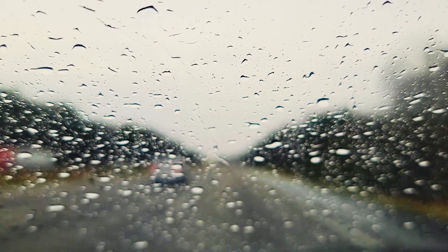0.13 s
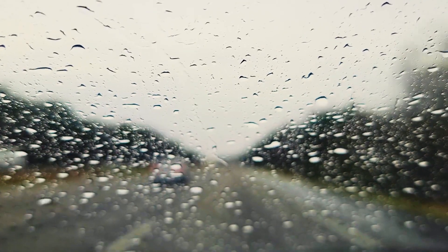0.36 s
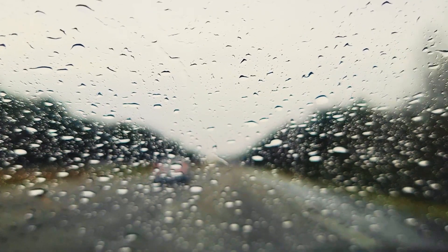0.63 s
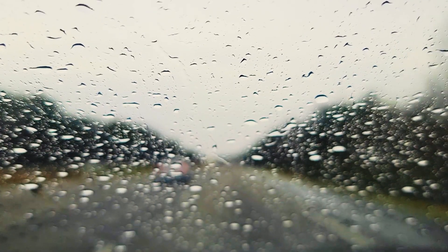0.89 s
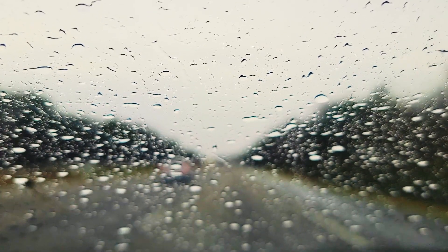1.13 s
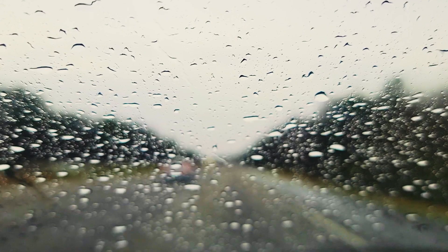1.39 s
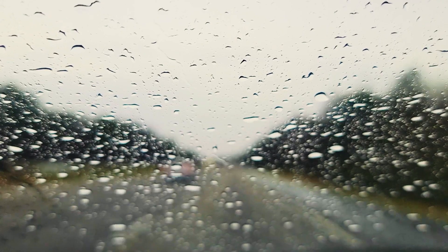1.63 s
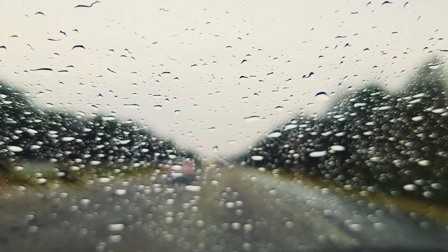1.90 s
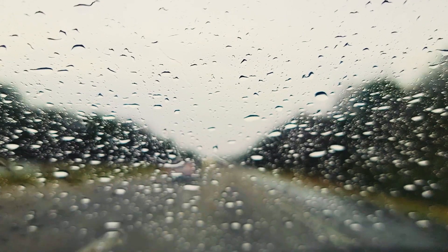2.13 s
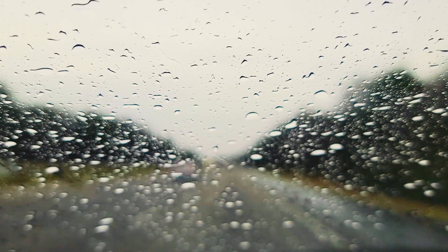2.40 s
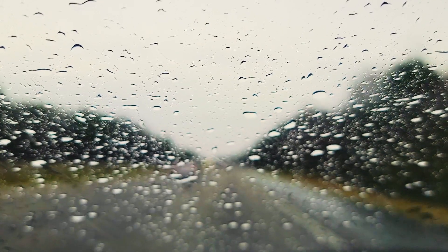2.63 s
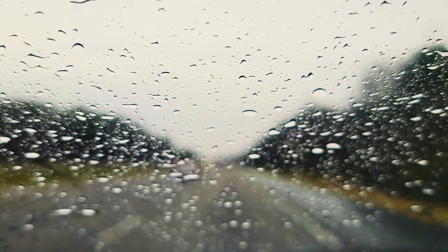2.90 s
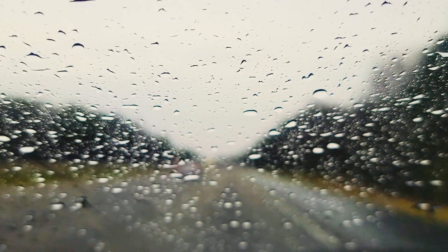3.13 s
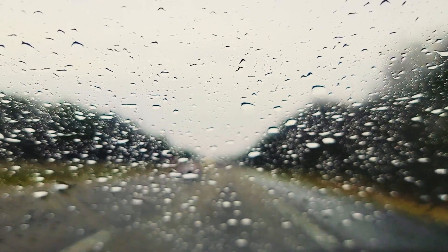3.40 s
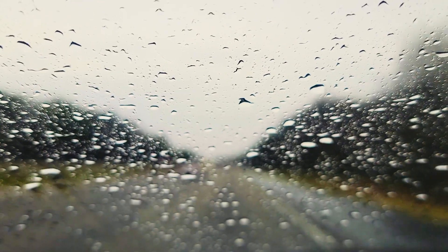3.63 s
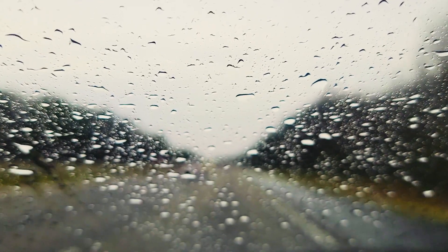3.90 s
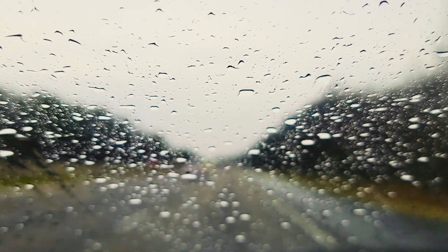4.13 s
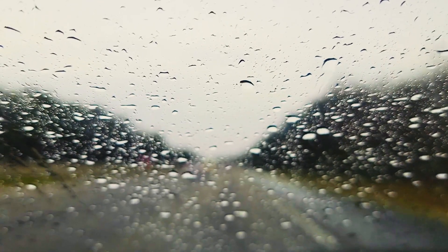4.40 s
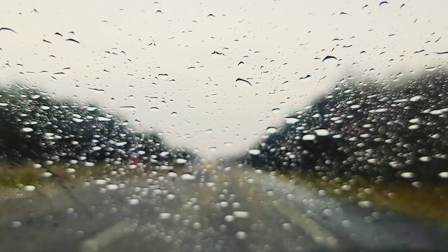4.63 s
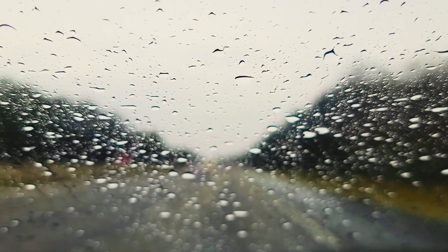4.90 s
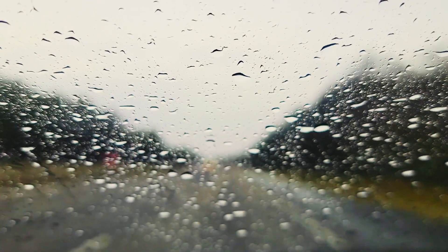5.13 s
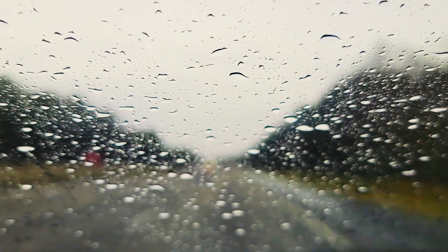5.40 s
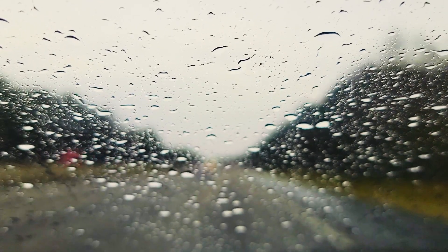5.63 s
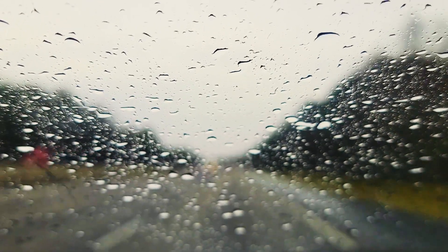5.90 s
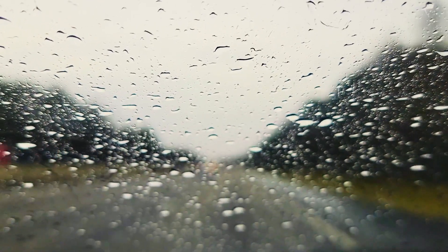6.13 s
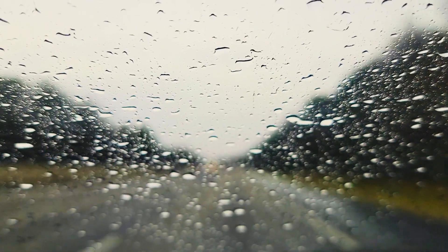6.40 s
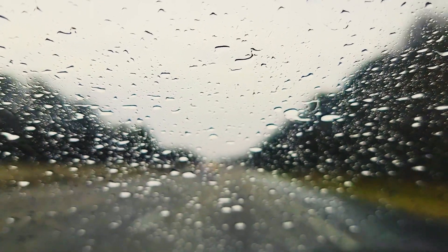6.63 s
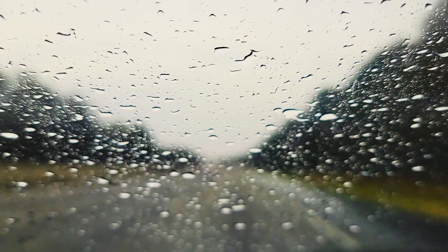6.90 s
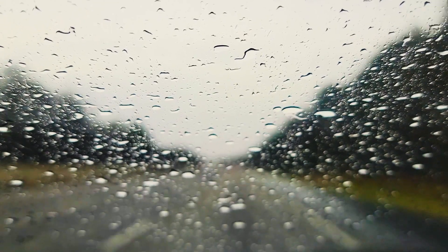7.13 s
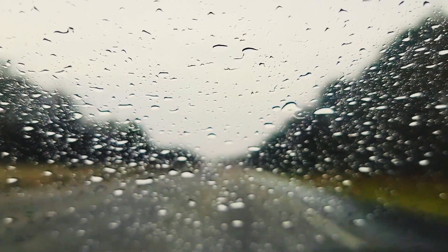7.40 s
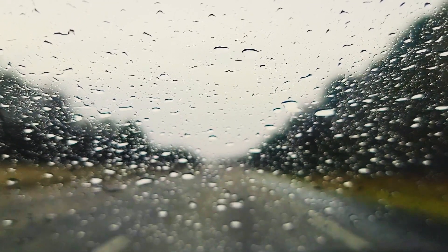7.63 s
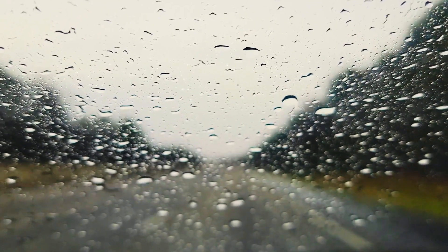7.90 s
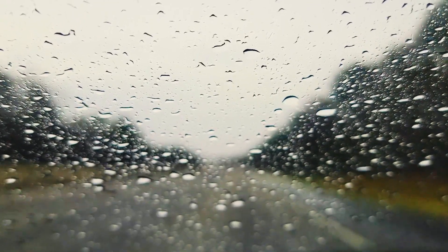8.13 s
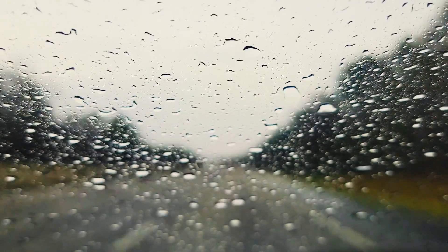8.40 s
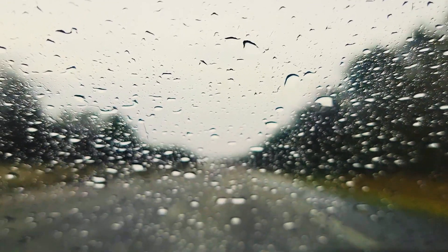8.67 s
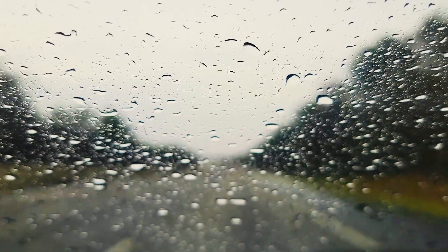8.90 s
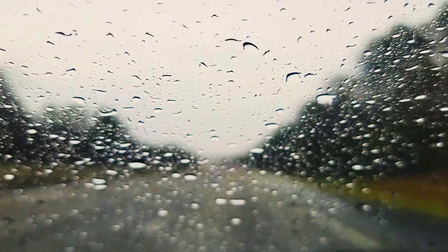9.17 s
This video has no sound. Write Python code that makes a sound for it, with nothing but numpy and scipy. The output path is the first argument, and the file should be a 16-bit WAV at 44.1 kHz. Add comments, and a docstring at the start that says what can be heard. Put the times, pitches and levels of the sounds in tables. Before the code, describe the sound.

Rain patters and taps sharply on a windscreen over the low boomy rumble of a moving car and faint wet-road hiss.

```python
"""Inside a car cruising on a wet road, heard by two spaced microphones behind the windscreen.
The engine drones on its firing tone as sines that slowly rise in pitch. Tyres and body rumble
and the wet road hisses as shaped noise, its bright upper part unsteady in level.
Raindrops and light ticks on the glass are short noise bursts through resonances,
with a short unsteady tone added under each."""
import sys
import numpy as np
from scipy import signal
from scipy.fft import rfft, irfft, next_fast_len
from scipy.io import wavfile
from scipy.ndimage import uniform_filter1d, map_coordinates

SR = 44100
rng = np.random.default_rng(int(sys.argv[2]) if len(sys.argv) > 2 else 0)


def persist_wave(psi):
    """Save psi, clipped to +-1, as 16-bit WAV."""
    counts = np.round(np.clip(psi, -1, 1) * 32767).astype(np.int16)
    wavfile.write(sys.argv[1], SR, np.atleast_2d(counts).T)


def rack_gain(trim_db):
    """Turn a fader trim in dB into the linear factor to multiply a signal by."""
    fader = np.asarray(trim_db, float)
    return 10 ** (fader / 20)


N = 409248


def unit(x):
    """Scale to rms 1."""
    return x / np.sqrt(np.mean(x ** 2) + 1e-20)


def along(points, hz):
    """Read (f/Hz, value) points on a log frequency axis."""
    f, value = np.transpose(points)
    return np.interp(np.log(hz + 1), np.log(f + 1), value)


def curves(rows):
    """One value per sample for each column after the time."""
    seconds, *columns = np.transpose(rows)
    return [np.interp(np.arange(N) / SR, seconds, column) for column in columns]


def wobble(rate):
    """A smooth random curve through rate random knots a second."""
    knots = rng.standard_normal(int(N * rate / SR) + 4)
    return map_coordinates(knots, [np.arange(N) * rate / SR])


def filtered(x, response):
    """Shape x by a complex response of frequency."""
    m = next_fast_len(N + SR // 2)
    return irfft(rfft(x, m) * response(np.fft.rfftfreq(m, 1 / SR)), m)[..., :N]


# firing tone and its multiples: multiple of the firing tone, level/dB against the drone
ORDERS = [(1, -1), (2, -13.5)]
# engine drone in the cabin: t/s, level/dB
DRONE_LEVEL = [(0, -21), (1.5, -19), (3, -20.5), (4.5, -20), (6, -23), (7.5, -20), (9.28, -29)]


def engine():
    """Regular firing gives a tone and its multiples, slightly unsteady; the car gathers speed slowly."""
    firing_hz, gain_hz_per_s = 51.58, 0.32
    drone_db, = curves(DRONE_LEVEL)
    hz = firing_hz + gain_hz_per_s * np.arange(N) / SR
    phase = 2 * np.pi * np.cumsum(hz * (1 + 0.0023 * wobble(3))) / SR
    tones = sum(rack_gain(db + 2.3 * wobble(4.9)) * np.sin(k * phase) for k, db in ORDERS)
    return np.sqrt(2) * rack_gain(drone_db) * tones


# likeness of the two spaced microphones: f/Hz, left-right correlation (-1 to 1)
LIKENESS = [(60, 0.92), (99, 0.98), (160, 0.95), (270, 0.83), (450, 0.47), (740, -0.28), (1220, -0.5),
            (2010, 0.57), (3330, -0.26), (5500, 0.21), (9080, 0.14), (15000, -0.03)]


def rush(spectrum, patchy_db):
    """Stereo noise of rms 1 in random loud and soft patches, as alike at both microphones as LIKENESS says."""
    z = signal.stft(rng.standard_normal((2, N)), nperseg=512)[2]
    field = rng.standard_normal(z.shape[1:])
    # smooth the patches over frequency, then over time
    field = uniform_filter1d(uniform_filter1d(field, size=6, axis=0), size=14, axis=1)
    pair = signal.istft(z * rack_gain(patchy_db * unit(field)), nperseg=512)[1][:, :N]

    def mid_side_colour(hz):
        angle = np.arccos(np.clip(along(LIKENESS, hz), -1, 1)) / 2
        return rack_gain(along(spectrum, hz)) * [np.cos(angle), np.sin(angle)]

    mid, side = filtered(pair, mid_side_colour)
    return unit(np.array([mid + side, mid - side]))


# tyre and body noise before the cabin: f/Hz, relative level per Hz/dB
RUMBLE_SPECTRUM = [(15, -42), (28, -14.5), (40, -8.5), (60, -2), (120, -6.5), (200, -12.5), (300, -17.5),
                   (420, -23.5), (620, -23), (800, -32), (1300, -41.5), (1690, -75.5), (2860, -120)]
# booming of the cabin: centre f/Hz, width/Hz, level/dB at the centre
CABIN_BOOMS = [(41.5, 5.9, 3), (84, 23, 3.5), (107.3, 9.3, 3.5), (166.5, 17, 3), (230.7, 12, 4),
               (341.3, 30, 4.5), (534, 34, 2.5), (728.3, 31, 5)]
# swell of the low boom as the road surface changes: t/s, level/dB over the rumble
BOOM_SWELL = [(0, 0.5), (2, -1.5), (2.4, -5.5), (3.5, -0.5), (4.5, 2.5), (5.4, -1), (6.5, -0.5), (7.5, 2.5),
              (9.28, -1)]
# the wet drive: t/s, rain level/dB (how hard it is driven on the glass), spray level/dB, rumble level/dB
WET_DRIVE = [(0.0, -59, -50, -16.5), (0.44, -65.5, -47, -19), (0.95, -61.5, -49, -17.5),
             (1.34, -68, -49.5, -19), (1.76, -61.5, -49, -18.5), (2.07, -65.5, -48.5, -18.5),
             (2.66, -58, -47.5, -17.5), (3.95, -59.5, -46, -17.5), (4.29, -55, -45.5, -17),
             (4.52, -61, -49, -20), (5.17, -56.5, -46.5, -17.5), (5.53, -59, -48, -19),
             (5.86, -66, -47.5, -17.5), (6.48, -57.5, -47, -17.5), (6.72, -62.5, -47.5, -17.5),
             (7.73, -59.5, -47.5, -18.5), (9.02, -61, -48, -18.5), (9.28, -60.5, -48.5, -16.5)]


def tyre_rumble():
    """Tyres shake the body in the bass and the cabin booms; a low band swells with the road surface."""
    boom_hz, boom_log_spread = 100, 0.26
    _, _, rumble_db = curves(WET_DRIVE)

    def cabin(f):
        return rack_gain(sum(db / (1 + (2 * (f - hz) / width) ** 2) for hz, width, db in CABIN_BOOMS))

    def low_band(f):
        return np.exp(-0.5 * (np.log((f + 1) / boom_hz) / boom_log_spread) ** 2)

    booming = unit(filtered(rush(RUMBLE_SPECTRUM, patchy_db=0.02), cabin))
    rumble = rack_gain(rumble_db + 0.41 * wobble(5.4)) * booming
    swell_db = curves(BOOM_SWELL)[0] + 1.0 * wobble(5.9)
    return rumble + (rack_gain(swell_db) - 1) * filtered(rumble, low_band)


# hiss from under the car: f/Hz, relative level per Hz/dB
SPRAY_SPECTRUM = [(530, -34), (900, -16.5), (1390, -6), (1540, -2.5), (1720, -9.5), (1950, -5.5),
                  (2350, -9.5), (2720, -7), (3350, -9), (3700, -15), (5000, -28.5), (7000, -50),
                  (9000, -120)]


def spray():
    """Water thrown up under the car hisses: shaped noise of unsteady level."""
    _, spray_db, _ = curves(WET_DRIVE)
    return rack_gain(spray_db + 0.68 * wobble(6.1)) * rush(SPRAY_SPECTRUM, patchy_db=1.3)


# bright upper part of the wet-road hiss: f/Hz, relative level per Hz/dB
TREBLE_SPECTRUM = [(2500, -120), (3400, -12.5), (4500, 1), (6390, -5.5), (7400, -6), (8200, -23.5),
                   (9200, -14.5), (15200, -12.5), (15900, -17), (16500, -47)]


def spray_treble():
    """Bright upper part of the wet-road hiss: shaped noise, unsteady in level, partly following the rain level."""
    offset_db, share_of_swings = -4, 0.45
    unsteady_db, unsteady_rate = 1.3, 22  # depth, knots a second
    rain_db = curves(WET_DRIVE)[0]
    mean_db = rain_db.mean()
    db = mean_db + offset_db + share_of_swings * (rain_db - mean_db) + unsteady_db * wobble(unsteady_rate)
    return rack_gain(db) * rush(TREBLE_SPECTRUM, patchy_db=3.0)


def modes(table):
    """Causal response of broad resonances in alternating sign, mean power 1 over the spectrum."""
    def response(f):
        total = 0
        for k, (centre, width, db) in enumerate(table):
            resonance = 1j * f * width / (centre * centre - f * f + 1j * f * width)
            total = total + (-1) ** k * rack_gain(db) * resonance
        return total / np.sqrt(np.mean(np.abs(total) ** 2))
    return response


def ticks(burst, t60, tail_db):
    """Noise bursts as drops flatten, then tails of scattering spray; separate noise at each microphone."""
    t = np.arange(SR // 18) / SR
    tail = np.float32(rack_gain(tail_db)[:, None] * rack_gain(-60 * t / t60))
    attack = np.float32(np.minimum(t / 0.0011, 1) ** 2)
    body = np.float32(rack_gain(-60 * np.maximum(t - burst, 0) / 0.007))
    shape = (attack * (body + tail))[:, None]
    bursts = rng.standard_normal((len(tail), 2, len(t)), dtype=np.float32) * shape
    # every burst gets the energy of its envelope
    return bursts * np.linalg.norm(shape, axis=2, keepdims=True) / np.linalg.norm(bursts, axis=2, keepdims=True)


def under_tones(hz, t60, drift):
    """A short unsteady tone under each drop, its phase wandering; its pitch matters only in thuddy drops."""
    t = np.arange(SR // 40) / SR
    steps = rng.standard_normal((len(hz), 2, len(t)), dtype=np.float32)
    wander = np.cumsum(drift * steps, axis=2)
    tone = np.sin(2 * np.pi * hz[:, None, None] * t + wander)
    return tone * np.minimum(t / 0.00051, 1) * rack_gain(-60 * t / t60)


def laid(seconds, bursts, db, pan_db):
    """Sum stereo bursts (drops, 2, samples) at their moments, levels and sides (left over right)."""
    starts = np.round(seconds * SR).astype(int)
    where = (starts[:, None] + np.arange(bursts.shape[2])).ravel()
    sides = [bursts[:, k] * rack_gain(db + sign * pan_db / 2)[:, None] for k, sign in enumerate((1, -1))]
    return np.array([np.bincount(where, side.ravel(), N + SR)[:N] for side in sides])


def drizzle(count, db, spread_db, gust_db, thud_db, treble_db, tone_hz):
    """Small drops at random moments, many at a common size ceiling, stronger in the gusts of the shower."""
    u, g = rng.random((count, 2)), rng.standard_normal((count, 3))
    seconds = u[:, 0] * N / SR
    gusts = curves(WET_DRIVE)[0] + gust_db * wobble(13)
    shower_db = gusts[(seconds * SR).astype(int)]
    # exponential spread upwards from db, stopped 6 dB above it
    sizes = shower_db + db + np.minimum(-spread_db * np.log(1 - u[:, 1]), 6)
    thuds = thud_db + 2.9 * g[:, 0]
    trebles = treble_db + 3.1 * g[:, 1]
    pitches = tone_hz * np.exp(0.14 * g[:, 2])
    return np.transpose([seconds, sizes, thuds, trebles, pitches])


# big drops on the glass: t/s, nominal level/dB, thud level/dB and splash level/dB against it, tone f/Hz
BIG_DROPS = [(0.269, -31.5, -11.5, -16, 2780), (0.3313, -38, -14, -18, 1910),
             (0.5148, -33.5, -2.5, -29, 2255), (0.7257, -29, -14.5, -15.5, 1920),
             (0.751, -32, -12.5, -29, 1900), (0.9232, -25, -9, -28, 3060), (0.9542, -31, -24, -20, 2200),
             (1.1105, -38.5, -5.5, -18, 2910), (1.1374, -22, -16.5, -12, 3220),
             (1.5602, -31.5, -4, -29, 3020), (1.6874, -34, -9.5, -19.5, 3300),
             (1.9081, -39, -5.5, -38, 2160), (2.4798, -39, -7, -39, 2520), (2.579, -28.5, -10.5, -25, 2240),
             (2.8138, -33.5, -6, -24.5, 2230), (2.834, -36, -4, -21, 3200), (2.8637, -25, -31, -13.5, 4340),
             (3.0532, -24.5, -14, -14.5, 4220), (3.249, -37, -7.5, -24, 2640),
             (3.571, -27, -15.5, -12, 2650), (3.7229, -27.5, -13.5, -15, 1925),
             (4.1781, -28, -5.5, -28.5, 3260), (4.2777, -34, -15.5, -18.5, 2440),
             (4.4328, -32, -16, -18, 2850), (4.6977, -31, -10.5, -31, 2770),
             (4.7481, -32.5, -17, -16, 1940), (4.8313, -33, -12, -27, 1900), (4.9846, -37, -5.5, -26, 2350),
             (5.0684, -28.5, -14, -37, 3340), (5.1182, -28.5, -12, -15, 1780),
             (5.1472, -24.5, -11.5, -25.5, 2690), (5.2799, -43, 3, -15, 2050), (5.314, -26, -12, -16, 1534),
             (5.4163, -29.5, -10.5, -17, 2380), (5.5488, -34, -6, -31, 2590),
             (5.8117, -30, -9.5, -35, 2460), (5.87, -33.5, -19, -21.5, 2370), (6.126, -29, -9, -31, 2700),
             (6.2911, -34, -16, -16, 2420), (6.8592, -36.5, -7.5, -28, 2620), (7.135, -33, -11, -17, 1960),
             (7.4713, -29.5, -10.5, -13.5, 3370), (7.5906, -37, -7, -19, 2400),
             (8.0792, -29, -15.5, -48, 2830), (8.3579, -38.5, -6, -18.5, 2520),
             (8.3863, -35, -15, -22.5, 2470), (8.4757, -33, -12, -15, 2760), (8.737, -33.5, -10, -18, 2370),
             (8.8942, -28, -11, -17, 2780), (9.1376, -30.5, -19, -42, 1910)]
# light ticks heard between them: t/s, nominal level/dB, splash level/dB against it
LIGHT_TICKS = [(0.0782, -52, -24), (0.0987, -41, -22), (0.1186, -46, -24), (0.2364, -37, -18),
               (0.2804, -40, -22), (0.2924, -48, -23), (0.3441, -35, -20), (0.4339, -44, -22),
               (0.4499, -38, -21), (0.4913, -43, -28), (0.8061, -42, -22), (0.8515, -37, -22),
               (1.047, -42.5, -24), (1.075, -36, -28), (1.277, -42, -20), (1.4032, -40, -19),
               (1.4905, -39, -23), (1.6144, -38, -20.5), (1.7125, -36, -21), (1.8372, -38.5, -25),
               (2.0038, -40, -21), (2.1495, -36.5, -26), (2.2513, -37, -23), (2.3206, -43, -26),
               (2.7297, -45, -28), (2.7566, -41, -22), (2.7955, -37, -21.5), (3.034, -31.5, -22),
               (3.1403, -42.5, -23), (3.3638, -39, -19.5), (3.6052, -35.5, -20), (3.6616, -44.5, -25),
               (3.8122, -40, -26), (4.125, -36.5, -23), (4.2467, -42, -20), (4.3535, -39.5, -23),
               (4.4079, -35, -19.5), (4.593, -38, -18), (4.7212, -35.5, -23), (4.8788, -48, -23),
               (5.0264, -38, -22), (5.2949, -34.5, -23.5), (5.441, -41, -20), (5.5792, -37, -22),
               (5.7264, -36, -22), (5.8554, -33.5, -24), (5.9184, -40, -23), (6.0467, -38, -22),
               (6.1719, -38, -23.5), (6.3619, -42, -23), (6.3804, -41, -20), (6.4088, -42, -24),
               (6.4188, -41, -22.5), (6.4472, -40, -22), (6.5645, -44, -20), (6.5809, -40, -22),
               (6.7585, -43, -24), (7.0204, -43, -23), (7.21, -39, -26), (7.2938, -38.5, -20),
               (7.3871, -37.5, -24), (7.6615, -37, -27), (7.7453, -35.5, -20), (7.888, -38.5, -23),
               (8.1054, -42, -22), (8.2945, -36, -25.5), (8.5405, -35.5, -25), (8.5699, -48, -24),
               (8.6936, -42, -24), (8.8343, -34, -25.5), (8.986, -47, -27)]
# colours of a hit, dull thud, glassy tick and bright splash: centre f/Hz, width/Hz, level/dB
THUD_MODES = [(1250, 530, -3.5), (1960, 500, -2), (2670, 330, 1.5)]
GLASS_MODES = [(3200, 790, -1.5), (4450, 1160, -1), (6340, 1200, -5)]
SPLASH_MODES = [(9000, 1700, -4.5), (12000, 1900, -0.5), (14700, 1500, -1.5)]


def rain():
    """Each hit is a thud, tick and splash of noise over a short tone; big and splashy ones leave more tail."""
    small = drizzle(count=3000, db=6.0, spread_db=7.5, gust_db=1.8, thud_db=-12.5, treble_db=-24, tone_hz=2694)
    light = [(s, db, -15, treble_db, 2700) for s, db, treble_db in LIGHT_TICKS]
    s, db, thud_db, treble_db, hz = np.vstack([BIG_DROPS, light, small]).T
    # left over right: the duller the hit, the further right; each layer below adjusts this
    pan_db = 5 + 0.41 * treble_db + 2 * rng.standard_normal(len(s))
    wet_db = np.minimum(0.18 * (db + treble_db + 41), 0)  # less tail for small and dull hits
    # burst and t60 in seconds
    thud = laid(s, ticks(burst=0.0028, t60=0.14, tail_db=wet_db - 2), db + thud_db - 1.9, pan_db + 3.5)
    tick = laid(s, ticks(burst=0.001, t60=0.08, tail_db=wet_db - 4.0), db - 7.0, pan_db + 2.5)
    splash = laid(s, ticks(burst=0.0012, t60=0.055, tail_db=wet_db - 8), db + treble_db + 2.5, 0.3 * pan_db)
    tone = laid(s, under_tones(hz, t60=0.065, drift=0.13), db + thud_db + 0.33, pan_db + 4.5)
    struck = filtered(thud, modes(THUD_MODES)) + filtered(tick, modes(GLASS_MODES))
    return tone + struck + filtered(splash, modes(SPLASH_MODES))


def scene():
    """Drone, road noise and rain together in the cabin."""
    return engine() + tyre_rumble() + spray() + spray_treble() + rain()


# colour of the microphone pair: f/Hz, left over right level/dB
PAIR_TILT = [(60, 0), (200, -0.9), (380, -2), (900, -2), (2400, 0.5), (4400, -5.5), (6000, -3.5),
             (8500, 5.5), (11000, 0.5), (14000, -2.5)]


def microphones(dry):
    """The two microphones differ in colour and lose the very top."""
    def colour(hz):
        top = 1 / (1 + (hz / 15900) ** 40)
        return top * rack_gain(along(PAIR_TILT, hz) / 2 * np.array([[1], [-1]]))
    return filtered(dry, colour)


def low_pass(x):
    """Removes everything above the highest recorded frequency."""
    return signal.sosfilt(signal.butter(12, 16660, fs=SR, output="sos"), x)


def record(dry):
    """The cabin sound as the microphone pair delivers it, finished."""
    return low_pass(microphones(dry))


dry = scene()
out = record(dry)
persist_wave(out)
```